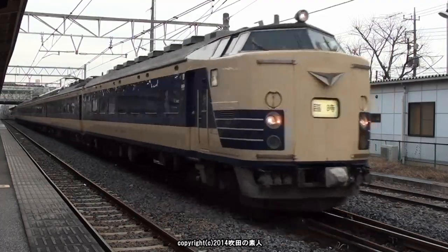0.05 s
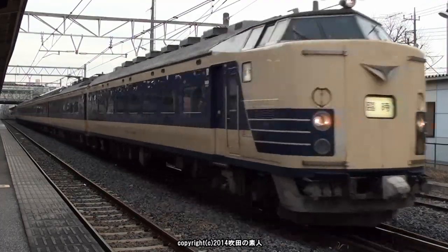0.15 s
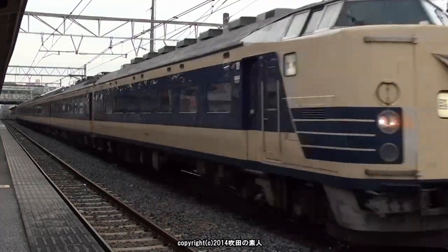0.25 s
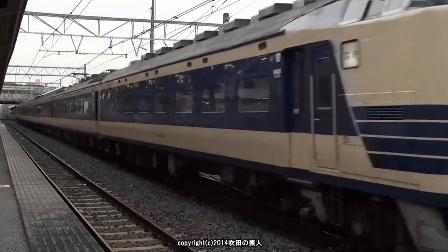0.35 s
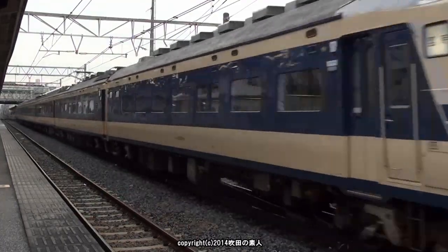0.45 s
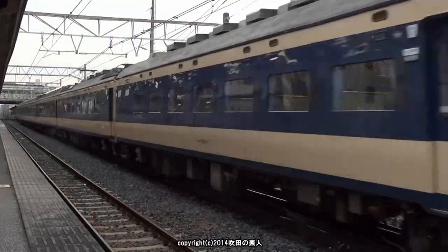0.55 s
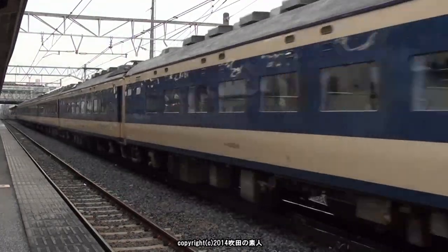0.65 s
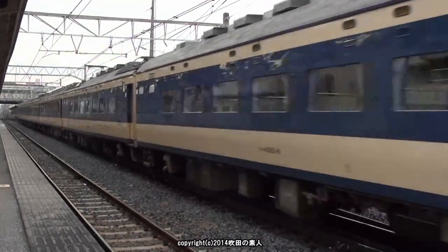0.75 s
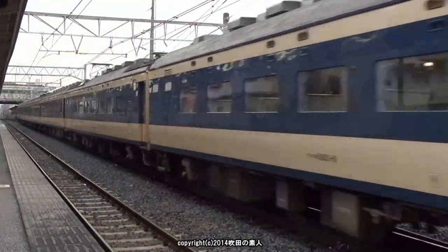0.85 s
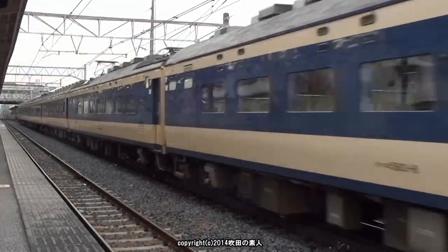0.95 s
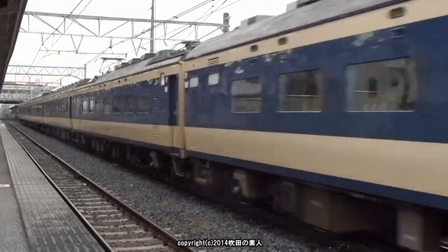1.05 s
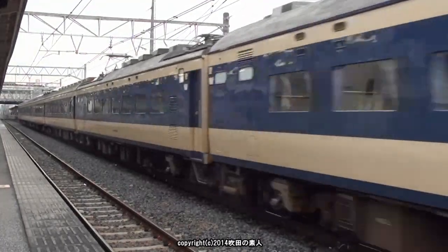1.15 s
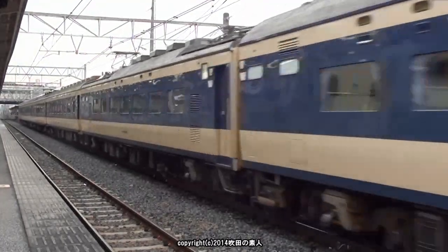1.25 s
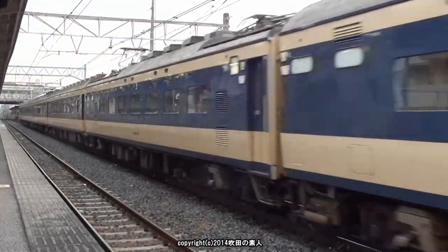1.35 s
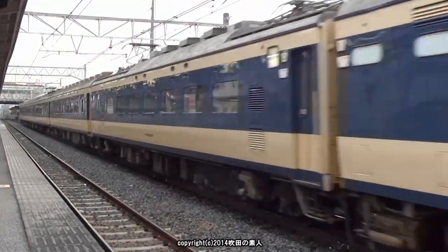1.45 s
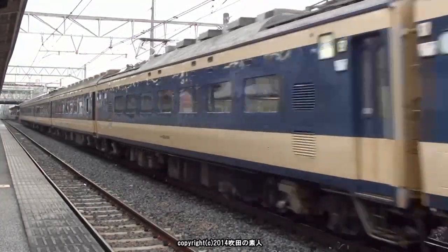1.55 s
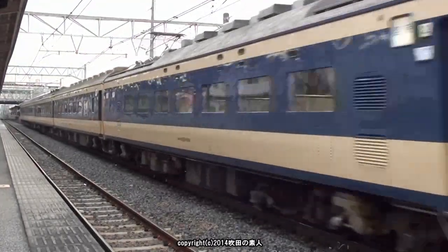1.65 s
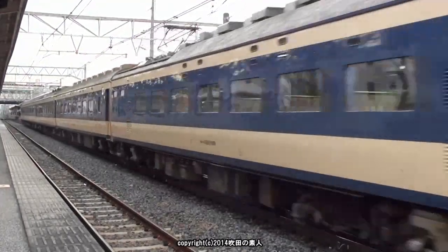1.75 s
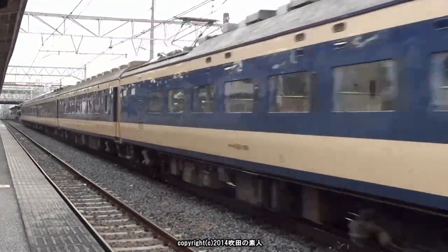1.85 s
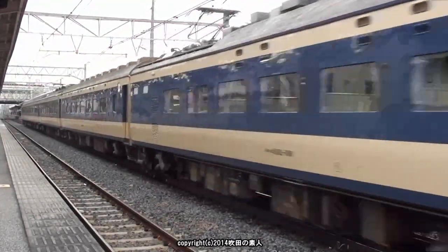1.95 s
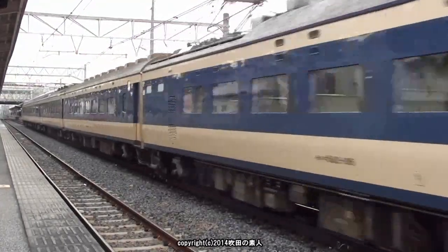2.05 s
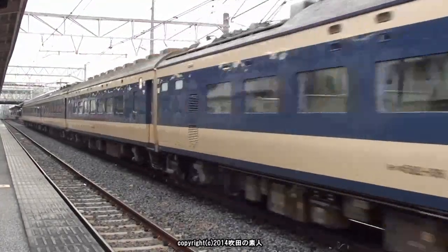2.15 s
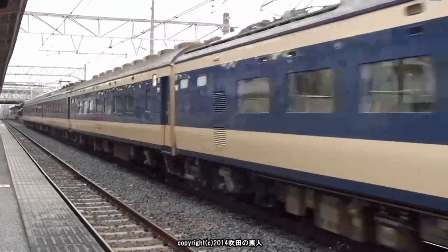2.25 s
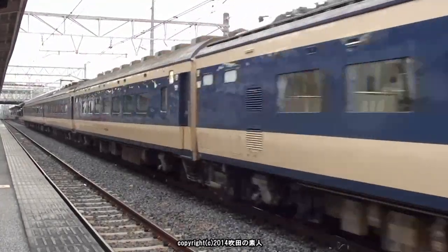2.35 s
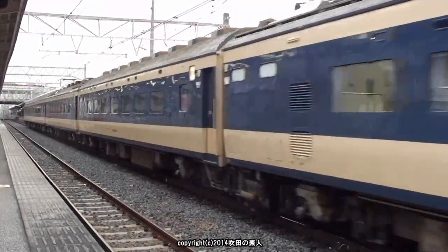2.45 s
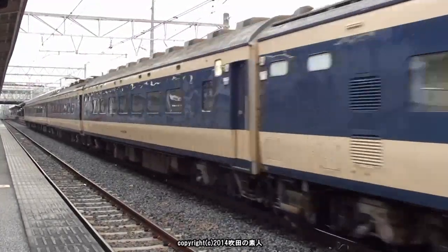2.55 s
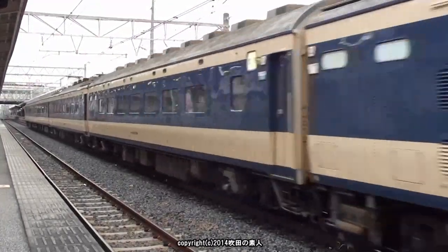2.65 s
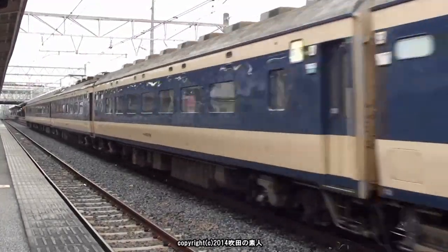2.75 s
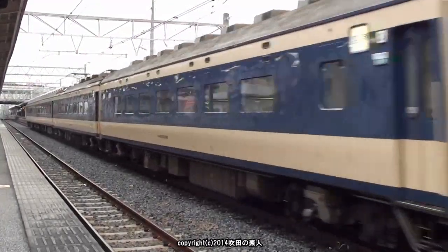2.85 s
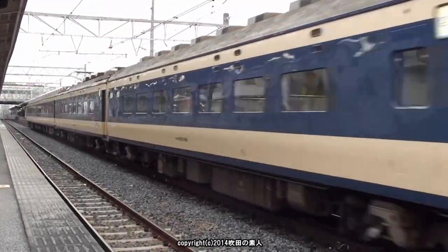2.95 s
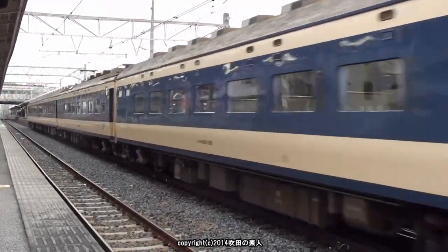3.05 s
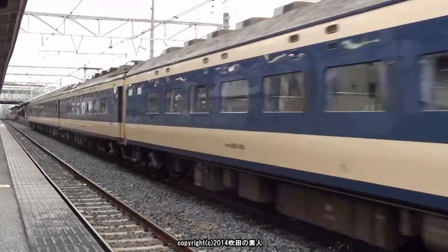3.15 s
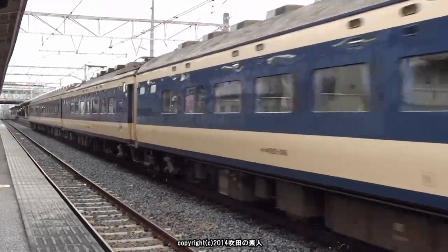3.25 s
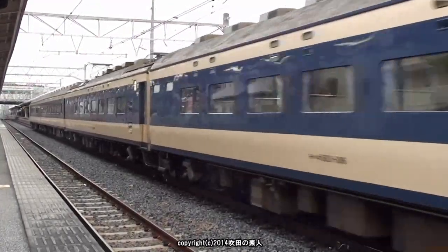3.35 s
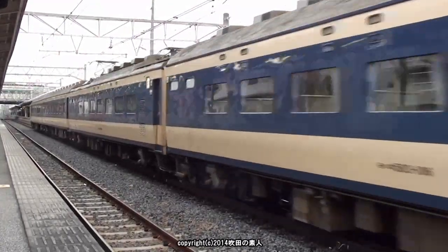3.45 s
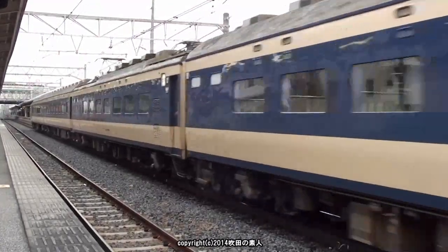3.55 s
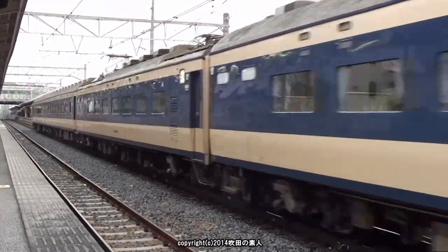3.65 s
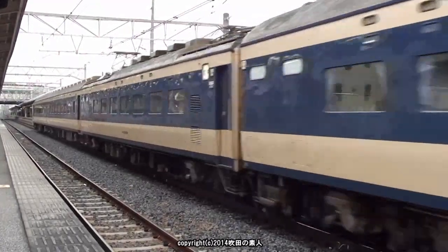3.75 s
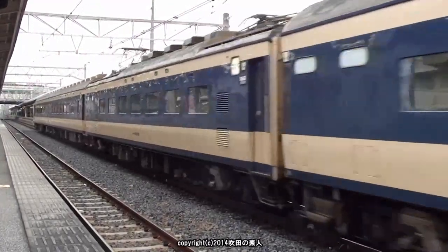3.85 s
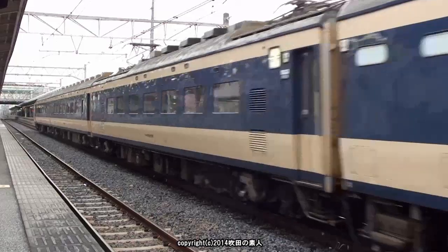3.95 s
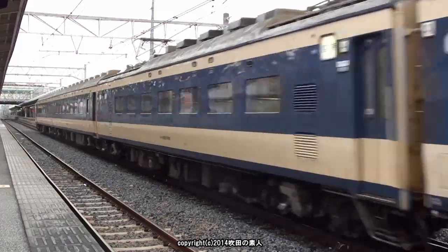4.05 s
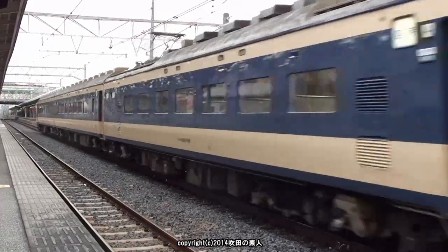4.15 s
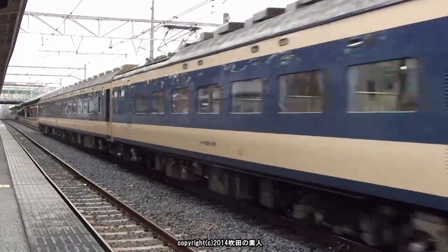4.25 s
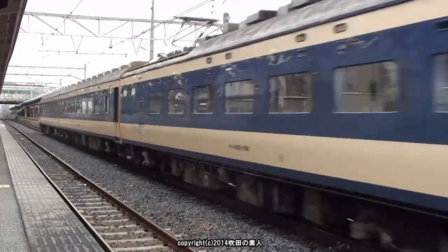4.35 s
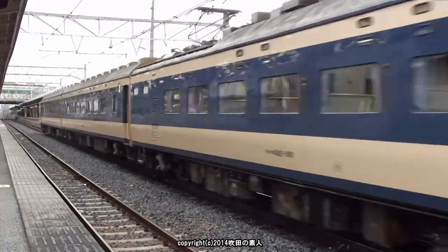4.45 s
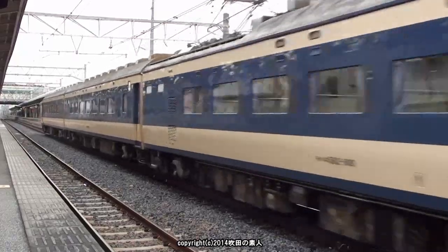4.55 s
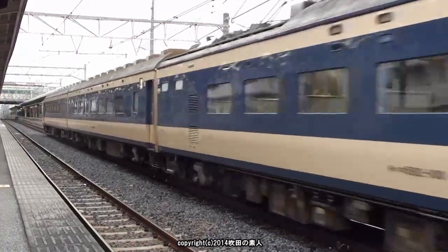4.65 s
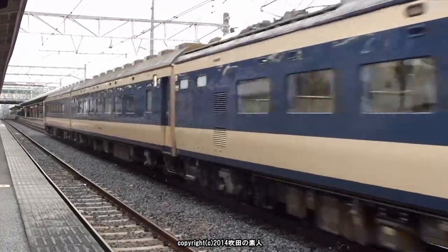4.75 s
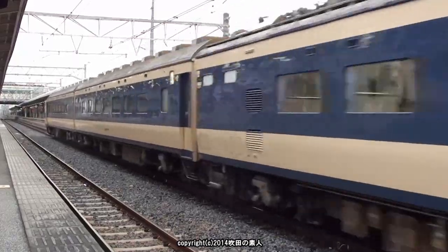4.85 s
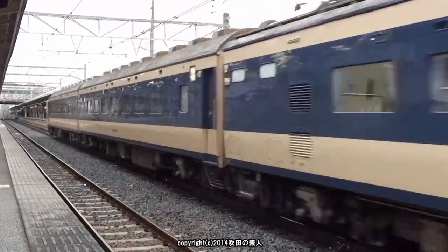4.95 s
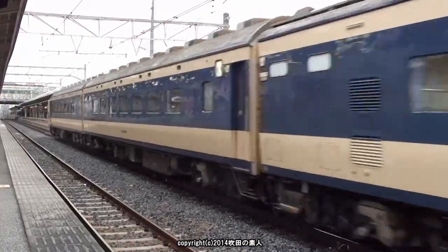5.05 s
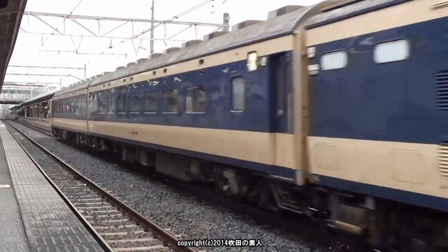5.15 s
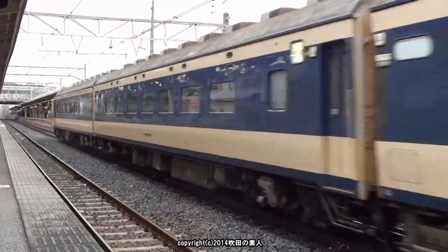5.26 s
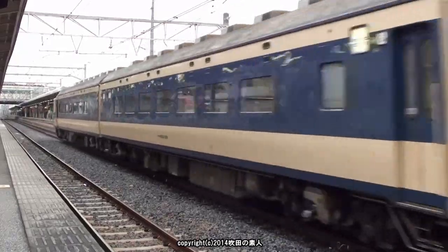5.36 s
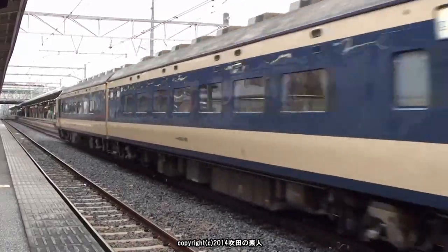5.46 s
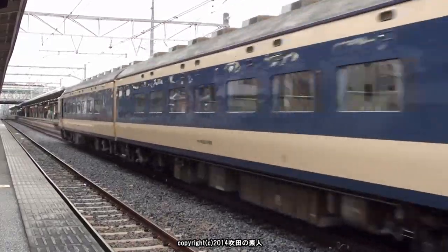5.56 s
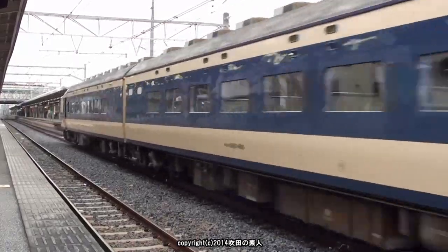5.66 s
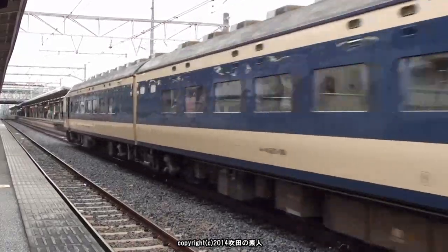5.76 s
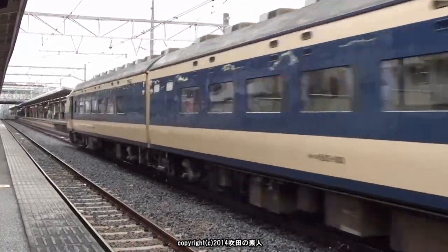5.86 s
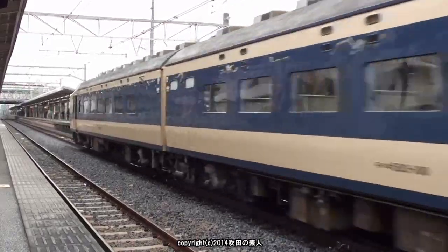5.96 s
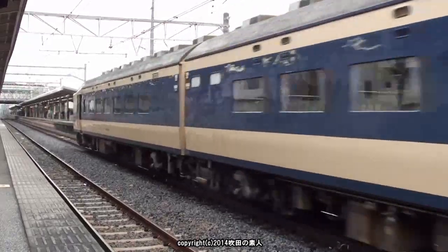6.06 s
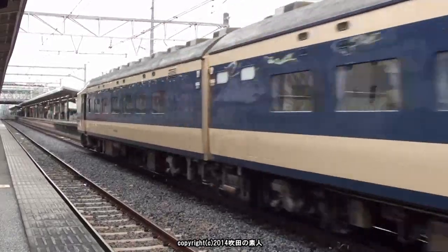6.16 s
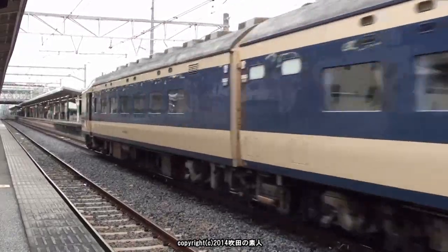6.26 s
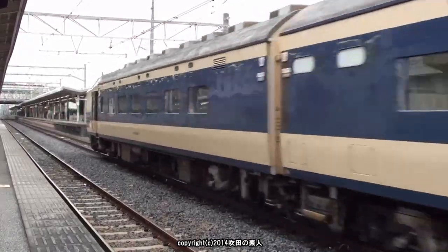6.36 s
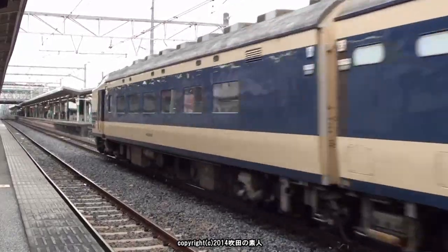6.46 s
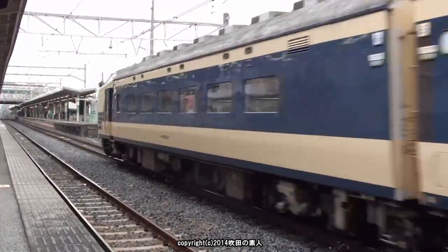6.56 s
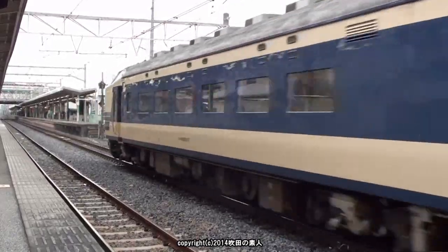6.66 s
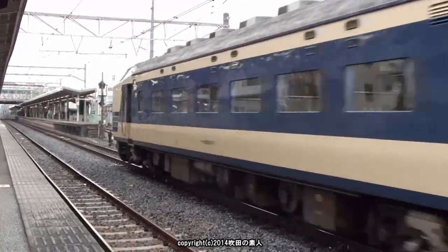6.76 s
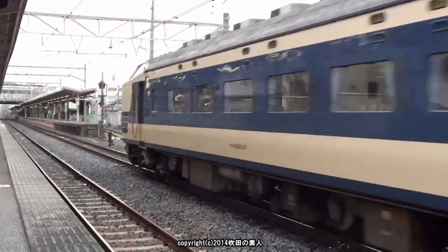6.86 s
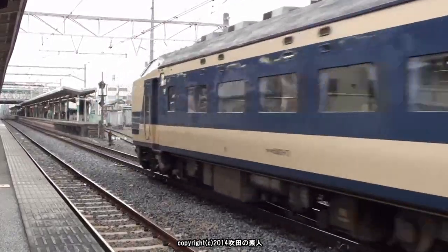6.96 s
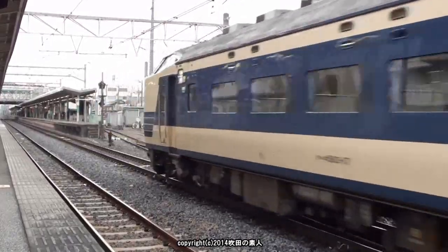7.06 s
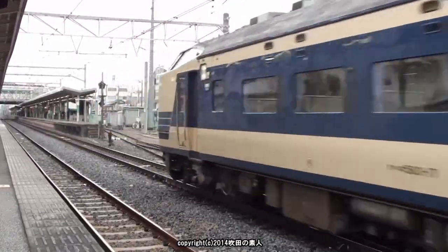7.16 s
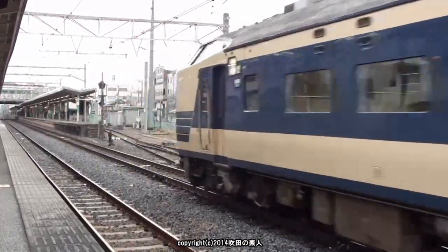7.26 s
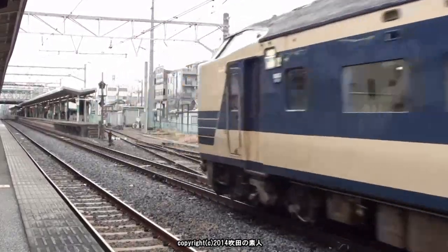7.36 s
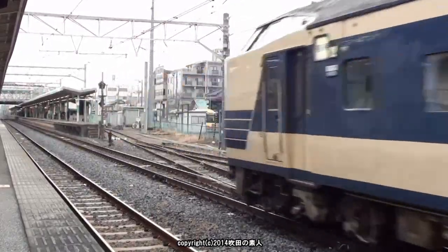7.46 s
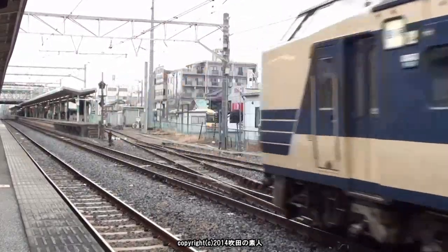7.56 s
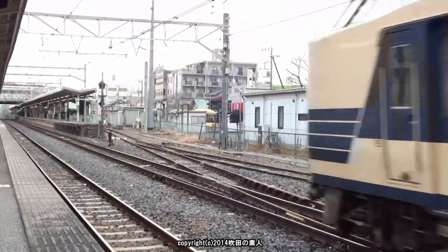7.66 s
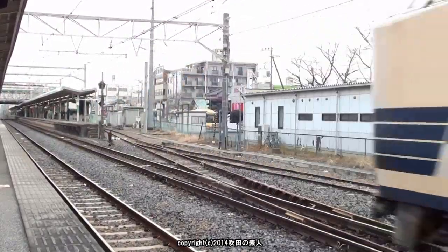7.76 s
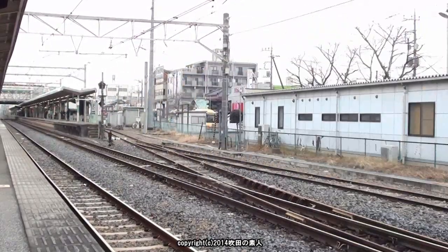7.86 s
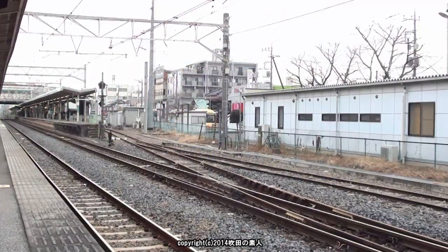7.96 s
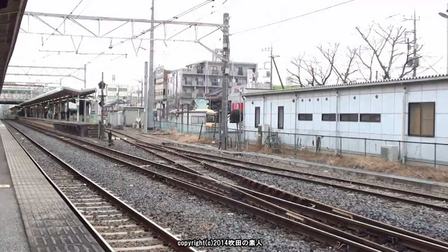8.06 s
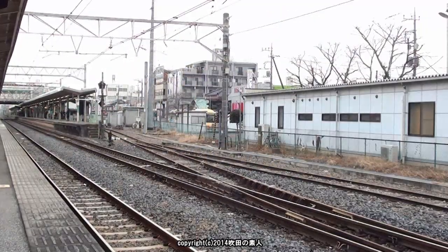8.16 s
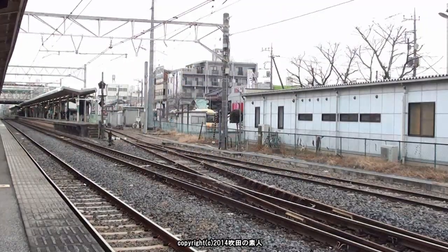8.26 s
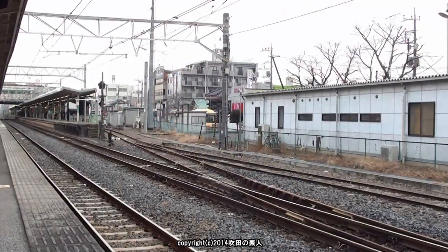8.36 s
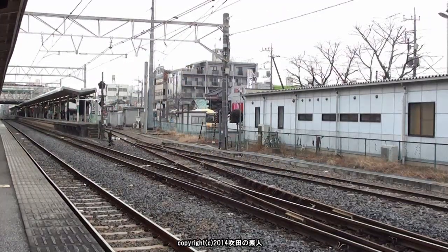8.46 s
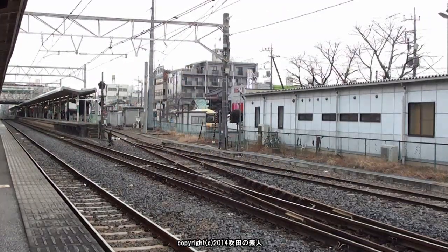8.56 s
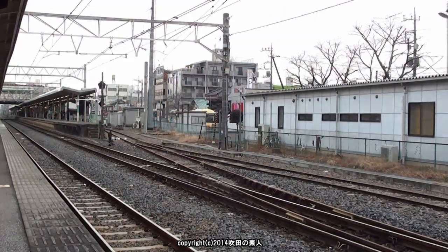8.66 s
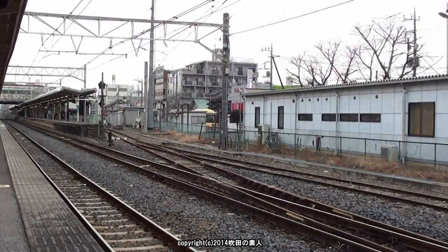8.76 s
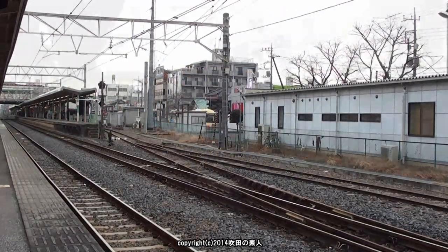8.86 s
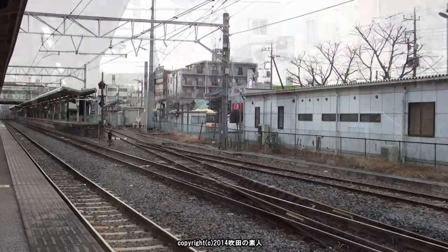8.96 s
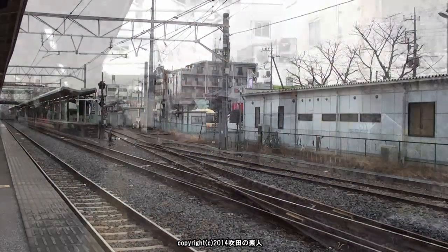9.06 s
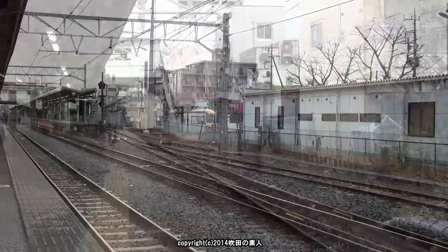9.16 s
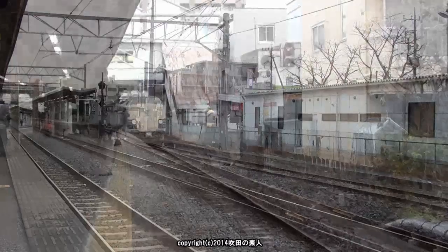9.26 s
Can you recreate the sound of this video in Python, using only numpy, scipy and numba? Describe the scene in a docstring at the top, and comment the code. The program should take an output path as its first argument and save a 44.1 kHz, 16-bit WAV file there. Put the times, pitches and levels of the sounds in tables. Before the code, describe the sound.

From an open station platform, stereo microphones catch an electric train already roaring past two tracks away. Paired wheel knocks, heavy thuds over points to the left, howling rails and ringing, hissing steel wheels surge with each car. Rough gear whine and brief squeaks colour the roar. After about eight seconds the last car passes and only lighter rail ticks and a dull receding rumble remain.

```python
"""Station platform: a six-car electric train runs past at about 60 km/h, two tracks from the microphone pair.
Damped modes and noise bursts make its thuds over gaps and knocks at rail joints; resonant noise makes the howling
rails, booming sleepers and gear chatter; shaped noise and random jars make the roar, hiss, points and distant rumble.
The steel wheels ring and drop in pitch as they go by; after the last car the noise falls away."""
import sys
import numpy as np
from scipy import signal
from scipy.fft import rfft, irfft
from scipy.io import wavfile
from scipy.ndimage import uniform_filter1d, map_coordinates
from numba import njit

SR = 44100
rng = np.random.default_rng(int(sys.argv[2]) if len(sys.argv) > 2 else 0)


def transcribe(u):
    """Save the signal u as a 16-bit wav file named by the first command-line argument.

    u: samples, shape (n,) or (channels, n), limited to [-1, 1]; the rate is SR.
    q: integer samples, one column per channel.
    """
    v = np.clip(np.atleast_2d(u).T, -1, 1)
    q = np.round(v * 32767).astype(np.int16)
    wavfile.write(sys.argv[1], SR, q)


N = 411012
T = np.arange(N) / SR
FREQS_HZ = np.maximum(np.arange(N // 2 + 1) * SR / N, 1)

# bogies drawing level with the microphones: t/s, wheel ring/dB, wheel pitch ratio, rolling roar/dB,
# sleeper boom/dB, tread hiss/dB, rumble on the points/dB (all levels relative)
BOGIES = [(.904, -18.5, .965, -23.5, -29, -38, -14.5), (1.755, -19.5, .955, -27.5, -23, -40.5, -19.5),
          (2.15, -28.5, .89, -22, -20.5, -37.5, -18), (3.003, -26.5, .95, -23, -28, -36, -19),
          (3.395, -33, .94, -19, -25.5, -37, -18.5), (4.254, -32, .93, -21, -21, -36, -19),
          (4.648, -27.5, .94, -25, -21, -39, -20), (5.505, -25, .95, -20, -26, -36, -19),
          (5.899, -28.5, .95, -24.5, -20, -43, -19), (6.763, -26.5, 1.02, -20.5, -36, -32, -19),
          (7.159, -22, .98, -23, -18.5, -42, -18.5), (8.024, -20, .995, -23.5, -17.5, -48, -19.5)]
SPEED_M_PER_S, TRACK_M, WHEELBASE_M = 16.39, 5.2, 2.1
SOUND_M_PER_S = 343

# along the line, positive = past the microphones: loudest bogie position, and distance at which power halves
POINTS_M, POINTS_REACH_M = -13.5, 2.31
ROAR_M, ROAR_REACH_M = -0.59, 5.5
BOOM_M, BOOM_REACH_M = -0.88, 3.4
HISS_M, HISS_REACH_M = 0.5, 3.9

ROAR_JARS_PER_S, POINTS_JARS_PER_S = 900, 220  # wheels jarred on plain track and on the points
SCRAPE_REFERENCE_DB = -18  # rumble level at which the flange scrape has its set level
SHUDDER_T60_S, CLANK_T60_S, CRACK_T60_S = .14, .11, 0.093
RECEDE_DB_PER_S = 2.5
GLIDE = .8  # share of the full Doppler bend heard in the wheel ring
LIMIT_DB, ATTACK_S, RELEASE_S = -8, .0015, .014  # gain control
TOP_HZ = 10150


def undb(db):
    """Decibels to gain."""
    return 10 ** (np.asarray(db) / 20)


def decibels(power):
    """Power to decibels."""
    return 10 * np.log10(power)


def across(curve):
    """A (f/Hz, value) table interpolated on a log-frequency axis."""
    hz, value = np.transpose(curve)
    return np.interp(np.log(FREQS_HZ), np.log(hz), value)


def resonances(modes):
    """Gain over frequency of (f/Hz, width/Hz, level/dB) modes, summed in power."""
    power = sum(undb(2 * db) / (1 + (2 * (FREQS_HZ - hz) / width) ** 2) ** 1.5 for hz, width, db in modes)
    return np.sqrt(power)


def noise(gain):
    """White noise through a response; rms 1."""
    x = irfft(rfft(rng.standard_normal(N)) * gain, N)
    return x / x.std()


def pitted(gain, rate, blur_hz=800):
    """Random jars, rate per second, through a response; they blur into a rush in the treble; rms 1."""
    jars = (rng.random(N) < rate / SR) * rng.choice([-1, 1], N) * (.5 + rng.random(N))
    blur = (FREQS_HZ / blur_hz) ** 2
    rush = rfft(rng.standard_normal(N))
    push = (rfft(jars / jars.std()) + blur * rush) / np.hypot(1, blur)
    x = irfft(push * gain, N)
    return x / x.std()


def walk(rate, size=N):
    """Random levels held 1 / rate s and smoothed twice; standard deviation 1."""
    hold = int(SR / rate)
    steps = np.repeat(rng.standard_normal(size // hold + 1), hold)
    x = uniform_filter1d(uniform_filter1d(steps, hold), hold)[:size]
    return x / x.std()


def around(s, reach_s):
    """The samples within reach_s of a moment."""
    return slice(max(int((s - reach_s) * SR), 0), min(int((s + reach_s) * SR), N))


def replay(ring, position):
    """A steady ring read at moving sample positions from a random start, which bends its pitch."""
    return map_coordinates(ring, [(position + rng.integers(N)) % (N - 1)], order=1)


def place(x, pan_db):
    """Two channels, the left louder by pan_db."""
    return x * undb(np.array([[1], [-1]]) * pan_db / 2)


def passing(at_m, reach_m, db):
    """Summed power of all bogies; each swells and fades as it runs through a spot on the line."""
    t = T[::100]
    along_m = SPEED_M_PER_S * (t - np.array(BOGIES)[:, :1]) - at_m
    power = undb(np.reshape(db, (-1, 1))) ** 2 / (1 + (along_m / reach_m) ** 2)
    return np.interp(T, t, power.sum(axis=0))


def struck(hits, modes, rise_s, noise_t60, detune=0.022):
    """Decaying modes (f, dB, t60) under blows (s, dB, pitch factor), and the envelope of noise shaken loose."""
    ring, power = np.zeros((2, N))
    hz, mode_db, t60 = np.transpose(modes)[:, :, None]
    for s, db, pitch in hits:
        span = slice(max(int(s * SR), 0), int((s + .5) * SR))
        age = np.maximum(T[span] - s, 0)
        blow = undb(db) * (1 - np.exp(-age / rise_s))
        # every sleeper is bedded a little differently
        mode_hz = pitch * hz * (1 + detune * rng.standard_normal(hz.shape))
        cycles = mode_hz * age + rng.random(hz.shape)
        decay = undb(mode_db - 60 * age / t60)
        ring[span] += blow * (decay * np.sin(2 * np.pi * cycles)).sum(axis=0)
        power[span] += (blow * undb(-60 * age / noise_t60)) ** 2
    return ring, np.sqrt(power)


def distant(level_db=-29.0, swell_db=2):
    """Bogies far down the line merge into a low, uneven rumble that recedes after the last car."""
    # spectrum: f/Hz, relative density/dB
    distant_spectrum = [(20, -24), (50, -13), (100, -2), (200, 0), (330, -5.5), (470, -2.5), (600, -5),
                        (1000, -9), (1500, -19), (4000, -32.5), (8000, -45), (10500, -64)]
    receding_db = RECEDE_DB_PER_S * np.maximum(T - BOGIES[-1][0], 0)
    return noise(undb(across(distant_spectrum))) * undb(level_db - receding_db + swell_db * walk(18))


def rolling(roar_db, hiss_db, body_db=-0.5, contact_db=2.0, flutter_db=1.43, grit_db=1.58):
    """Rough treads shake rails and sleepers, and hiss unevenly at the contact patch."""
    # shaken rails and sleepers: f/Hz, relative density/dB
    roar_spectrum = [(30, -36), (90, -4.5), (220, -2.5), (350, 2), (500, 3), (610, 2), (800, 2),
                     (1020, -2.5), (1250, -5.5), (1500, -14.5), (2300, -11.5), (3200, -15), (5000, -37),
                     (10000, -63)]
    # contact patch: f/Hz, relative density/dB
    hiss_spectrum = [(500, -35), (1500, 9.5), (2550, 3.5), (3600, 7), (4600, 5), (5400, 4), (6500, 5),
                     (7300, 4), (8200, 0), (9200, -2.5), (10200, -58)]
    body = pitted(undb(across(roar_spectrum)), rate=ROAR_JARS_PER_S)
    body = body * undb(body_db + flutter_db * walk(25))
    hiss = noise(undb(across(hiss_spectrum)))
    hiss = hiss * undb(contact_db + grit_db * walk(70) + 0.88 * walk(26))
    return body * undb(roar_db) + hiss * undb(hiss_db)


def thuds(level_db=1.0, shudder_db=-11):
    """A wheel drops into a gap: the track bed thumps in damped modes and the ballast shudders as noise."""
    # wheels dropping into gaps of the points and onto loose sleepers: t/s, relative level/dB, pitch ratio
    drops = [(.001, -9.5, 1.2), (.073, -3.5, 1.04), (.125, -9.5, 1.04), (.201, -17.5, 0.98),
             (.249, -10.5, 1.22), (.412, -13.5, 1), (.881, -8.5, 1.1), (.962, -7, .9), (1.052, -10, 1.2),
             (1.231, -5, 1.05), (1.334, -6, 1.15), (1.375, -15, 0.92), (2.083, -9, 0.98), (2.189, -9, 0.95),
             (2.222, -5, 1.01), (2.296, -10.5, 1.05), (2.481, -6.5, 1.06), (2.596, -7.5, 1.06),
             (2.72, -17, 1), (3.328, -9.5, 0.97), (3.436, -8, 1.1), (3.475, -12.5, 0.83), (3.547, -13.5, 1),
             (3.712, -8.5, 1), (3.858, -9.5, 1.06), (4.6, -11, 1.1), (4.685, -10.5, 1.13),
             (4.735, -11.5, 0.87), (4.98, -8.5, 1), (5.112, -9.5, .97), (5.837, -8, 1.08),
             (5.938, -6, 1.15), (5.99, -10.5, 0.93), (6.358, -9.5, 0.99), (6.915, -13.5, 1.28),
             (7.092, -7.5, 0.85), (7.195, -7, 0.96), (7.245, -10, 0.99), (7.311, -11.5, 1.1),
             (8.18, -12.5, 1.5), (8.308, -11, 1.48), (8.612, -27, 1.04), (8.688, -20.5, 0.83),
             (9.012, -26, 1.35), (9.078, -17, 0.9), (9.263, -22.5, 1.15)]
    # sleeper and track bed modes: f/Hz at pitch ratio 1, relative level/dB, t60/s
    bed_modes = [(111.2, -10, 0.23), (137.4, -1.5, 0.19), (181, -4, 0.13), (245, -6, 0.21), (350.5, -4, .1)]
    # ballast: f/Hz, relative density/dB
    shudder_spectrum = [(25, -23.5), (65, -21), (105, -2), (135, 6), (200, 10), (300, -10), (600, -23),
                        (2000, -74)]
    ring, envelope = struck(drops, bed_modes, rise_s=0.0074, noise_t60=SHUDDER_T60_S)
    shudder = envelope * noise(undb(across(shudder_spectrum)))
    return undb(level_db) * ring + undb(shudder_db) * shudder


def jolts(t60=0.31, rise_s=0.011):
    """Loose steel under the cars clashes in short bursts of shaped noise."""
    # couplers and brake rigging jolting: t/s, relative level/dB
    clashes = [(0.003, -17.5), (0.662, -18.5), (1.06, -19.5), (1.18, -18.5), (2.39, -25.5), (2.762, -22),
               (3.681, -20.5), (4.925, -24), (6.18, -25), (7.485, -19), (7.8, -20), (8.25, -28),
               (8.315, -20.5)]
    # steely clash: f/Hz, relative density/dB
    clash_spectrum = [(500, -13), (1100, 4), (1700, -8.5), (2500, 0), (4000, -3), (6500, -5.5), (9000, -10),
                      (10500, -20.5)]
    strength = np.zeros(N)
    for s, db in clashes:
        span = around(s, .5)
        age = np.maximum(T[span] - s, 0)
        strength[span] += (1 - np.exp(-age / rise_s)) * undb(db - 60 * age / t60)
    return strength * noise(undb(across(clash_spectrum)))


def squeaks():
    """A flange rubs the rail and a narrow, scratchy note swells and fades."""
    # flange notes: centre t/s, f/Hz, relative level/dB, half length/s, bandwidth/Hz
    flange_notes = [(0.014, 8500, -26.5, 0.044, 132), (0.21, 9000, -37.5, 0.13, 399),
                    (0.897, 8840, -36, 0.14, 397), (1.078, 2440, -27, 0.026, 50.2),
                    (2.702, 2310, -31, .04, 69.7), (2.8, 4300, -35, .045, 130),
                    (3.081, 2340, -31, .15, 260), (4.245, 3120, -34.5, 0.16, 89.7),
                    (4.81, 1970, -29, 0.014, 40), (4.966, 2550, -27, .032, 35),
                    (5.451, 3140, -35.5, 0.29, 149), (5.482, 1960, -34, 0.063, 101),
                    (5.728, 2500, -30, 0.096, 91), (6.155, 2475, -31.5, 0.11, 100),
                    (6.77, 2750, -32, 0.11, 110.7)]
    out = np.zeros(N)
    for s, hz, db, length_s, width_hz in flange_notes:
        span = around(s, .5)
        t = T[span]
        swell = np.exp(-((t - s) / length_s) ** 2)
        # random complex envelope spreads the tone into a narrow band
        grip = walk(2 * width_hz, size=len(t)) + 1j * walk(2 * width_hz, size=len(t))
        note = swell * np.real(grip * np.exp(2j * np.pi * hz * t))
        out[span] += undb(db) * note * np.sqrt(np.sum(swell ** 2) / np.sum(note ** 2))
    return out


def knocks(level_db=1, clank_db=-7, crack_db=-1.5):
    """A wheel hits a rail joint: the rail end cracks, the sleeper knocks and the bogie frame clanks."""
    # wheels on joints, the last far down the line: t/s, relative level/dB, sleeper f/Hz, relative crack/dB
    joint_hits = [(0.054, -13.5, 370, -24), (.557, -16, 477, -15.5), (.698, -14, 467, -21),
                  (1.063, -5.5, 397.5, -6), (1.18, -11.5, 388, -18), (1.912, -12, 419, -14),
                  (2.045, -11, 421, -16.5), (2.3, -8, 414, -13), (2.426, -6, 445, -15),
                  (3.161, -11, 409, -15), (3.293, -9, 418, -12.5), (3.55, -6.5, 430, -14),
                  (3.68, -5.5, 415, -15), (4.411, -14, 443, -18.5), (4.541, -7, 411, -13),
                  (4.803, -4.5, 424, -16.5), (4.926, -10.5, 433, -11.5), (5.663, -8.5, 438, -15.5),
                  (5.791, -9.5, 413, -20), (6.052, -7, 455, -16), (6.187, -6.5, 403, -19),
                  (6.921, -12, 433, -18), (7.047, -8, 403, -19), (7.315, -9, 398, -16),
                  (7.438, -8.5, 430, -18), (7.951, -12.5, 485, -13.5), (8.182, -8, 412, -16),
                  (8.308, -8.5, 468, -14.5), (8.42, -22, 475, -15.5), (8.503, -19, 521, -18),
                  (8.574, -17.5, 486, -21.5), (8.664, -20, 490, -21), (8.735, -16, 457, -23.5),
                  (8.817, -15.5, 468, -25), (8.974, -17, 484, -31), (9.128, -25, 483, -26.5)]
    # struck sleeper modes: multiple of its pitch, relative level/dB, t60/s
    sleeper_modes = [(0.361, -5, 0.095), (.62, -8, 0.077), (1, -4, 0.23), (1.17, -8, 0.15),
                     (1.85, -9.5, 0.068)]
    # bogie frame: f/Hz, relative density/dB
    clank_spectrum = [(100, -39), (240, -14), (380, 7.5), (470, -0.5), (600, -17), (900, -14), (1500, -11),
                      (5000, -21.5), (9000, -40), (11000, -61)]
    # rail end: f/Hz, relative density/dB
    crack_spectrum = [(100, -23), (250, 0.5), (600, 0), (900, 2), (1400, -8), (2500, -10.5), (5000, -23.5),
                      (10000, -45)]
    blows = [row[:3] for row in joint_hits]
    ring, envelope = struck(blows, sleeper_modes, rise_s=0.0037, noise_t60=CLANK_T60_S)
    crack = np.zeros(N)
    for s, _, _, db in joint_hits:
        span = slice(int(s * SR), int((s + .5) * SR))
        crack[span] += undb(crack_db + db - 60 * (T[span] - s) / CRACK_T60_S)
    clank = envelope * noise(undb(across(clank_spectrum)))
    return undb(level_db) * ring + undb(clank_db) * clank + crack * noise(undb(across(crack_spectrum)))


def points(rumble_db, shake_db=-0.5, sizzle_db=-33, judder_db=1.1, sizzle_falloff=1.6):
    """Bogies shake the track bed while flanges scrape the check rail; the scrape fades faster as they leave."""
    # track bed: f/Hz, relative density/dB
    rumble_spectrum = [(20, -44), (45, -35), (70, -15.5), (110, 0.5), (140, -2.5), (240, 1), (380, -0.5),
                       (560, -9), (1200, -52), (3000, -66)]
    # flange scrape: f/Hz, relative density/dB
    sizzle_spectrum = [(2000, -3), (5000, -9), (7800, -3), (8900, 3), (9600, -0.5), (10500, -8.5)]
    rumble = pitted(undb(across(rumble_spectrum)), rate=POINTS_JARS_PER_S)
    rumble = rumble * undb(shake_db + judder_db * walk(30))
    scrape = noise(undb(across(sizzle_spectrum))) * undb(sizzle_db + 2.8 * walk(35))
    scrape_db = sizzle_falloff * (rumble_db - SCRAPE_REFERENCE_DB)
    return rumble * undb(rumble_db) + scrape * undb(scrape_db)


def rails(level_db=-1, sag_per_s=.07, throb_db=1.76):
    """Rail resonances howl up under each car, throbbing and sinking in pitch, and die down."""
    # rail resonances: f/Hz before the pitch sag, width/Hz, relative level/dB
    rail_modes = [(690, 150, -1.5), (800, 80, -0.5), (888, 64, -1), (1080, 130, -8.5)]
    # howls, one per car: peak t/s, relative level/dB, Gaussian half length/s
    howls = [(0.621, -22.5, 0.27), (1.75, -20, .3), (3.02, -21.5, 0.31), (4.302, -20, 0.21),
             (5.549, -21.5, 0.31), (6.78, -20.5, 0.31), (8.02, -24, 0.35)]
    out, ring = np.zeros(N), noise(resonances(rail_modes))
    for s, db, length_s in howls:
        span = around(s, 1)
        age = T[span] - s
        howl = replay(ring, (age - sag_per_s * age ** 2 / 2) * SR)
        out[span] += howl * undb(db) * np.exp(-(age / length_s) ** 2 / 2)
    return out * undb(level_db + throb_db * walk(20))


def gears(whine_hz=1168, width_hz=90, sideband_hz=1270, sideband_db=-8, swell_s=0.2, level_db=-3):
    """The traction gears chatter in a rough, broken note that swells as each motor bogie passes."""
    # motor bogies going by: t/s, relative gear whine/dB
    motor_bogies = [(.58, -25), (1.55, -26), (3.12, -21.5), (4.35, -23.5), (5.579, -23.5), (6.82, -23)]
    swell = sum(undb(db) / (1 + ((T - s) / swell_s) ** 2) for s, db in motor_bogies)
    chatter = undb(level_db + 2.5 * walk(28))
    whine = noise(resonances([(whine_hz, width_hz, 0), (sideband_hz, width_hz, sideband_db)]))
    return swell * chatter * whine


def sleepers(boom_db, boom_hz=445, width_hz=120, share_db=-5, throb_db=2):
    """The sleepers boom in their bending mode, throbbing irregularly under the wheels."""
    return noise(resonances([(boom_hz, width_hz, 0)])) * undb(boom_db + share_db + throb_db * walk(22))


def wheels(beam=1.6, ahead_m=2.03, detune=.008, turn_hz=6.1, wobble=0.22, sweep_db=3.0, carry=0.026):
    """Wheels ring in their modes, loudest just before they draw level; the changing path bends their pitch."""
    # wheel modes: f/Hz at pitch ratio 1, width/Hz, relative level/dB
    wheel_modes = [(501, 77, 8), (755, 160, 2), (2010, 93, 2.5), (2636, 80, 1), (3357, 120, -1.5),
                   (4210, 79, -1), (5093, 100, -4.5), (6080, 143, -6), (6880, 440, -10.5)]
    out = np.zeros((2, N))
    ring = np.zeros(N)
    for hz, width_hz, db in wheel_modes:
        # the contact wanders across the tread, so each mode flares up on its own
        flare = undb(db + 1.5 * walk(18))
        ring += noise(resonances([(hz, width_hz, 0)])) * np.sqrt(width_hz) * flare
    ring = ring / ring.std()
    for s, db, ratio, *_ in BOGIES:
        span = around(s, 2)
        t = T[span]
        for end in (-1, 1):
            along_m = SPEED_M_PER_S * (t - s) + end * WHEELBASE_M / 2
            distance_m = np.hypot(TRACK_M, along_m)
            # emission time in samples, with slight random pitch wander
            emitted = (t - GLIDE * distance_m / SOUND_M_PER_S) * SR
            emitted = emitted + .007 * np.cumsum(walk(16, size=len(t)))
            # the two wheels of an axle are worn differently: one rings sharp, one flat
            pitches = ratio * (1 + detune * np.array([-1, 1]) * (.5 + rng.random(2)))
            heard = sum(replay(ring, emitted * pitch) for pitch in pitches)
            turning = 1 + wobble * np.sin(2 * np.pi * (turn_hz * t + rng.random()))
            # the tread grips and slips, so the ring comes in bursts
            bursts = undb(1.8 * walk(45, size=len(t)) - 1)
            # a wheel disc beams sideways; only a little carries along the track
            beamed = (TRACK_M / np.hypot(TRACK_M, along_m + ahead_m)) ** beam
            facing = beamed + carry * TRACK_M / distance_m
            axle = heard * turning * bursts * facing * undb(db) / 2
            out[:, span] += place(axle, -sweep_db * along_m / distance_m)
    return out


def platform(x, scatter_t60=0.3):
    """Direct sound reaches the microphone pair unequally; platform and canopy scatter a diffuse part."""
    # level difference: f/Hz, left minus right/dB
    lean = [(60, 0.5), (190, -1), (570, -1.5), (1000, -3), (3100, -4), (5450, -3.5), (9500, -3)]
    # phase difference: f/Hz, left lead/rad
    lead = [(25, .3), (125, 0.26), (340, 0.66), (600, 0.53), (950, 0.31), (2600, 0.093), (9500, .01)]
    # sound scattered by platform and canopy: f/Hz, level relative to direct/dB
    diffuse = [(40, -35), (130, -25), (500, -19), (1000, -12), (4000, -12), (9000, -8)]
    scatter = rfft(rng.standard_normal(N) * undb(-60 * T / scatter_t60))
    scatter *= undb(across(diffuse)) / np.sqrt(np.mean(np.abs(scatter) ** 2))
    side = np.array([[1], [-1]])
    direct = undb(side * across(lean) / 2) * np.exp(.5j * side * across(lead))
    return irfft(rfft(x) * direct * (1 + side * scatter), N)


def scene(points_pan_db=3.0):
    """The whole train, heard from the platform; the points lie to the left."""
    # sound carried along the rails: t/s, relative roar/dB, relative contact hiss/dB
    carried = [(0, -21, -29), (1.6, -24.5, -29.5), (3.6, -27, -31), (5.6, -30, -30.5), (7.6, -24.5, -33),
               (8.34, -21.5, -33.5), (8.47, -30.5, -40.5), (9.0, -30, -47.5), (9.32, -50, -71)]
    s, *columns = np.transpose(carried)
    rail_roar, rail_hiss = (undb(np.interp(T, s, column)) ** 2 for column in columns)
    _, _, _, tread_db, sleeper_db, contact_db, shake_db = np.transpose(BOGIES)
    roar_db = decibels(rail_roar + passing(ROAR_M, ROAR_REACH_M, tread_db))
    hiss_db = decibels(rail_hiss + passing(HISS_M, HISS_REACH_M, contact_db))
    boom_db = decibels(passing(BOOM_M, BOOM_REACH_M, sleeper_db))
    rumble_db = decibels(passing(POINTS_M, POINTS_REACH_M, shake_db))
    crossing = place(points(rumble_db) + thuds(), points_pan_db)
    track = rolling(roar_db, hiss_db) + rails() + sleepers(boom_db) + knocks()
    return platform(track + crossing + wheels() + gears() + jolts() + squeaks() + distant())


@njit
def follow(x, attack, release):
    """Envelope that rises quickly and sinks slowly."""
    out, e = np.empty(len(x)), .2
    for i in range(len(x)):
        e += (x[i] - e) * (attack if x[i] > e else release)
        out[i] = e
    return out


def record(dry):
    """A gain control ducks both channels above its limit; stray peaks are rounded and the top is cut."""
    envelope = follow(np.abs(dry).max(axis=0), 1 / (ATTACK_S * SR), 1 / (RELEASE_S * SR))
    held = dry * np.minimum(1, undb(LIMIT_DB) / envelope)
    rounded = held / (1 + (held / .92) ** 6) ** (1 / 6)
    low_pass = signal.ellip(8, .2, 70, TOP_HZ, fs=SR, output="sos")
    return signal.sosfilt(low_pass, rounded)


dry = scene()
out = record(dry)
transcribe(out)
```